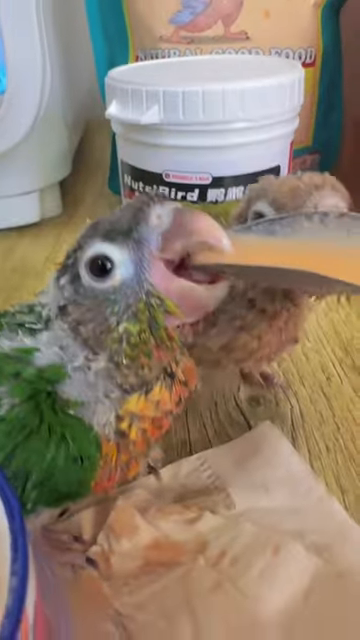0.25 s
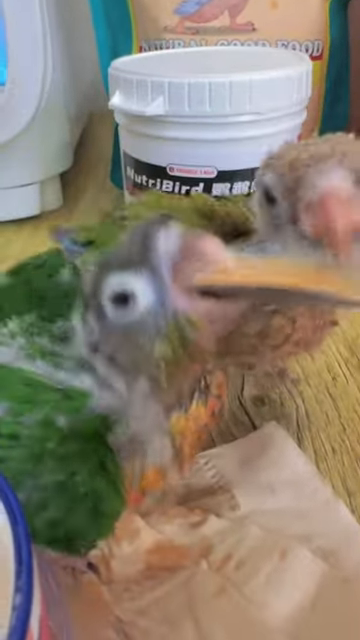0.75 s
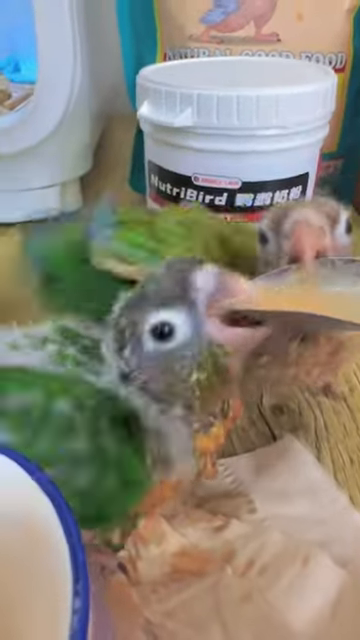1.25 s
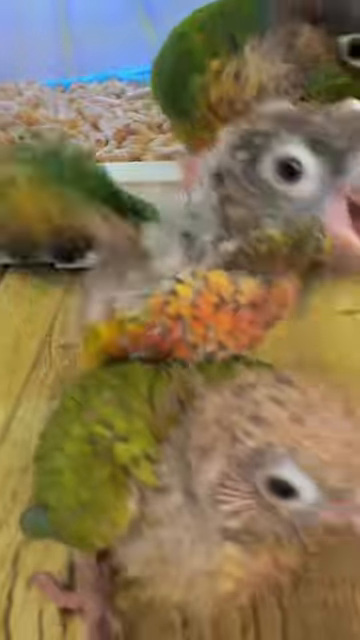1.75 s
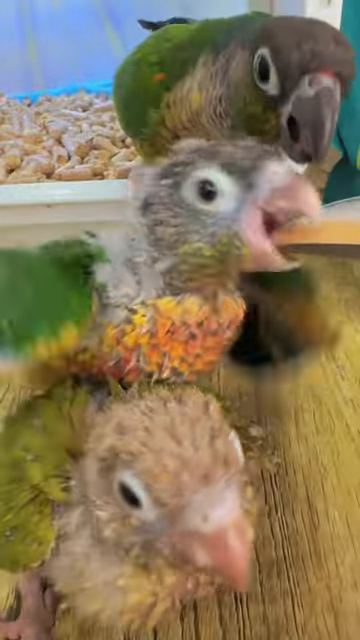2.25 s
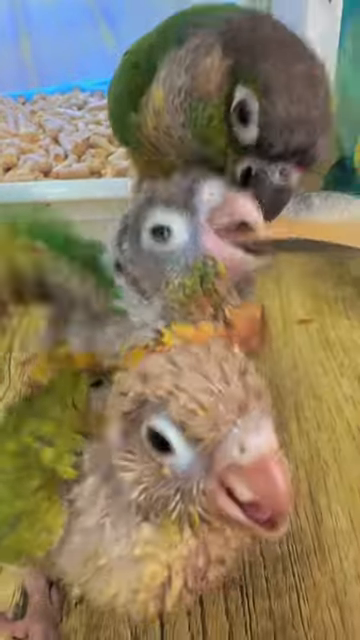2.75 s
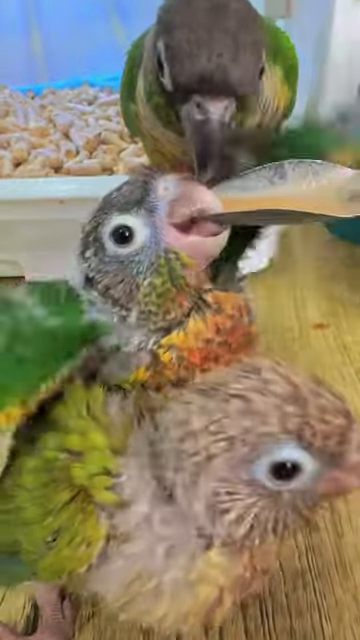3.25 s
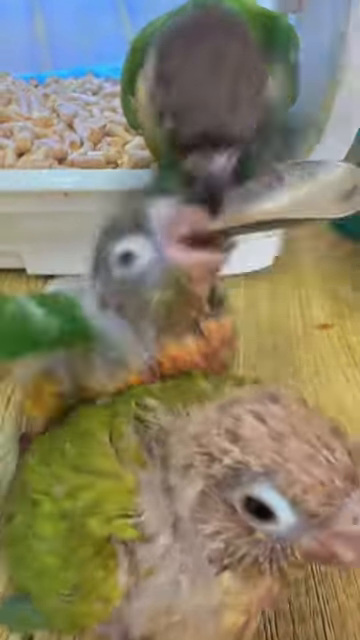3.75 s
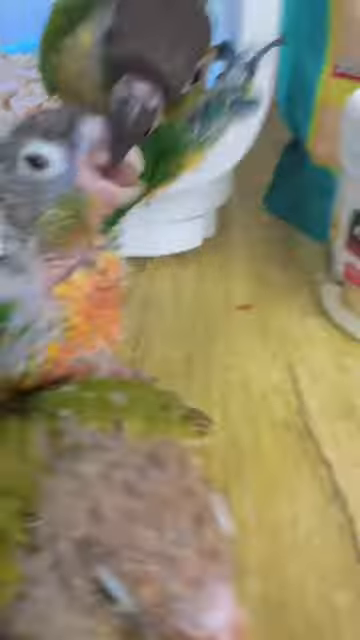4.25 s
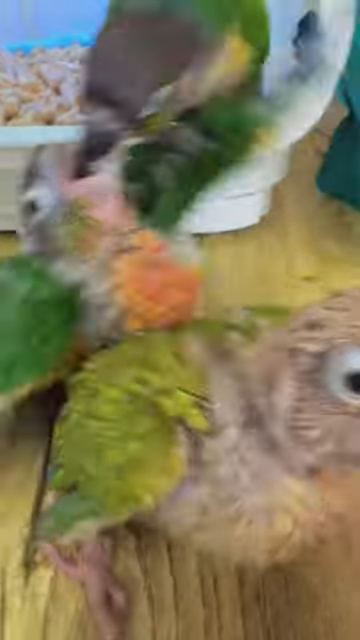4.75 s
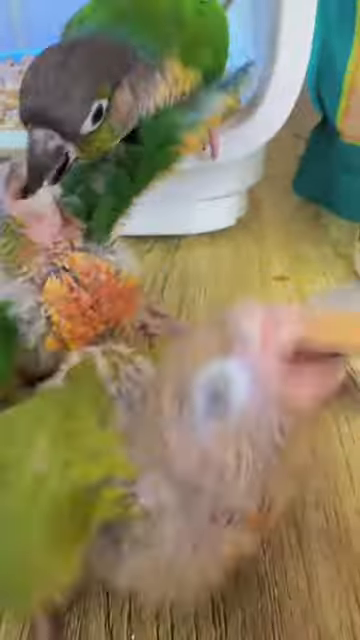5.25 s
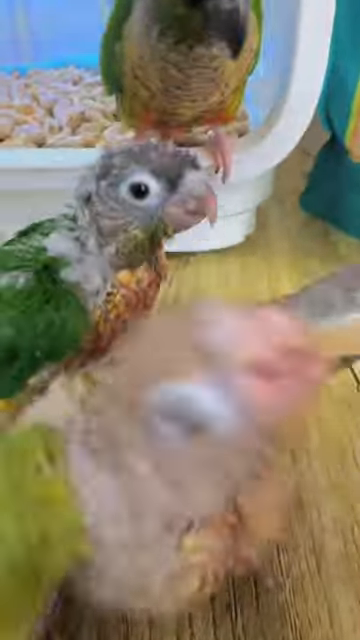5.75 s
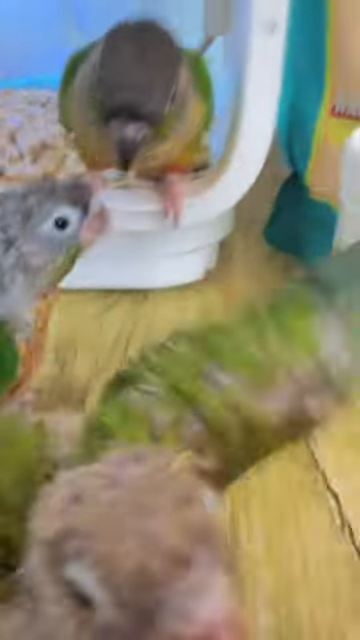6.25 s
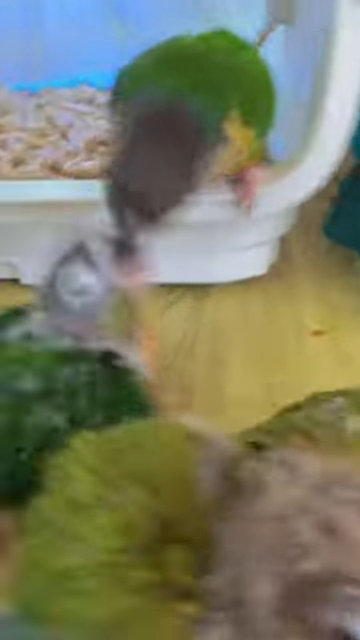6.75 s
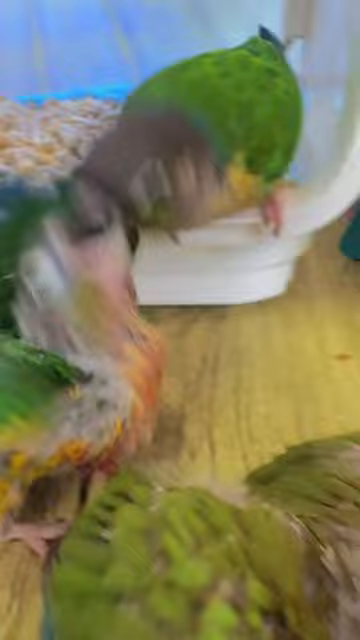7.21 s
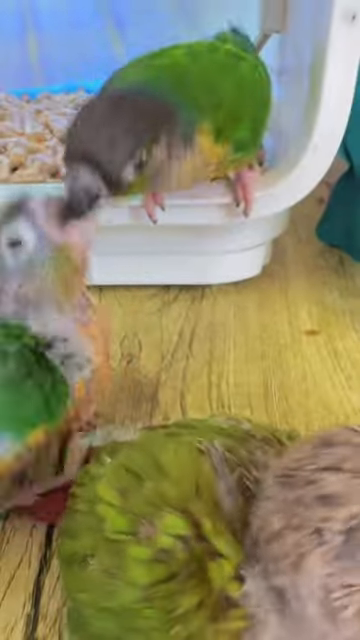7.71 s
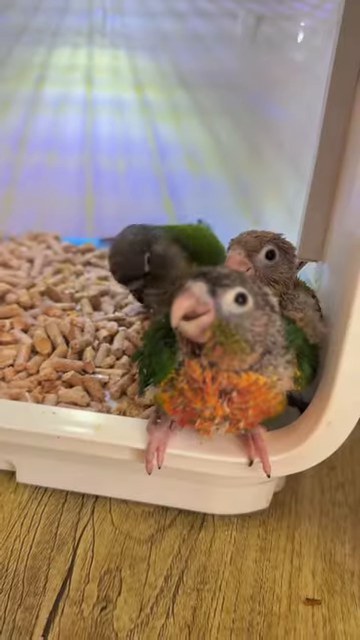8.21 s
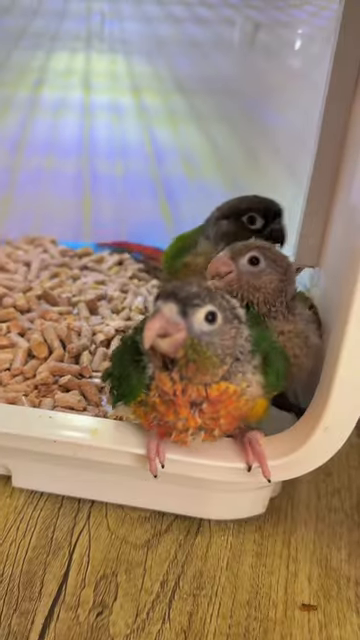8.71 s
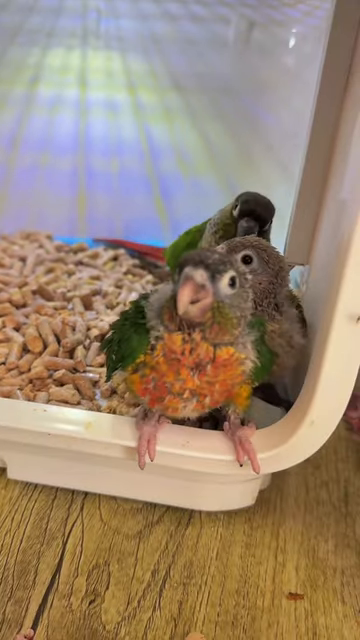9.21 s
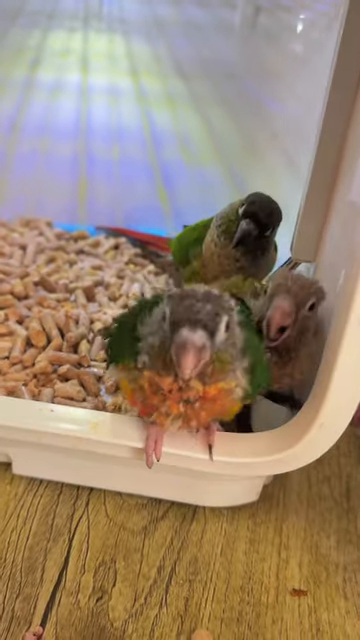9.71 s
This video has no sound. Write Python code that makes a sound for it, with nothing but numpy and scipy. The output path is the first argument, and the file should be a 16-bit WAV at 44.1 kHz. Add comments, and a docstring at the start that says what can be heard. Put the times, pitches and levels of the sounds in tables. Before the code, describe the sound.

Short squeaky chirps and raspy squawks from several baby parrots repeat in uneven clusters, heard up close indoors. Faint spoon ticks and soft shuffling sit under the calls. About two thirds through, a few clicks build to a sharp tap on the spoon, followed by hollow bumps on a plastic tub and rustling feathers. The birds then call in a quick flurry, with two thin whistles, over faint room air.

```python
"""Young parrots beg at a feeding spoon, crowded on a wooden floor, close by in a small room. Each squawk is a
short arch of pitch from the syrinx, clear or rasping, shaped by throat and beak; a few carry a dull puff, and
two late calls are thin whistles. Beaks and claws tick and ring the spoon, bodies bump a plastic tub, and low
thuds follow some squawks. Low rumble and feather rustle follow the stirring, over faint room air."""
import sys
import numpy as np
from scipy import signal
from scipy.fft import rfft, irfft, next_fast_len
from scipy.io import wavfile

SR = 44100
rng = np.random.default_rng(int(sys.argv[2]) if len(sys.argv) > 2 else 0)


def bounce(signal):
    """Save signal as a 16-bit WAV file at the path given by the first command-line argument."""
    frames = np.transpose(np.atleast_2d(signal))
    limited = np.clip(frames, -1, 1)
    pcm = np.round(limited * 32767).astype(np.int16)
    wavfile.write(sys.argv[1], SR, pcm)


N = 439677

# Stirring envelopes (time [s], relative level [dB])
RUMBLE_ENVELOPE = [(0.0, -73.5), (0.94, -79.5), (1.86, -70.5), (3.19, -85.5), (3.64, -75.5), (3.97, -60.5),
                   (4.33, -81.5), (5.28, -82.5), (5.69, -71.5), (6.75, -69), (7.3, -72), (7.53, -61),
                   (8.02, -62.5), (9.97, -63.5)]
RUSTLE_ENVELOPE = [(0.0, -88.5), (0.5, -75.5), (0.94, -75.5), (1.91, -75), (3.13, -82), (3.91, -62.5),
                   (4.02, -65.5), (4.28, -76), (4.91, -87), (5.97, -71.5), (6.94, -71.5), (7.36, -65),
                   (7.53, -61.5), (7.77, -52.5), (8.0, -65.5), (9.97, -70.5)]
# Noise spectra (frequency [Hz], gain [dB])
RUMBLE_SPECTRUM = [(12, -39), (20, -10), (43, -3.5), (65, 1.5), (200, -18), (260, -41.5), (440, -120)]
RUSTLE_SPECTRUM = [(70, -16), (130, -2), (330, -5.5), (500, -13), (900, -14.5), (1600, -26), (4000, -37)]
AIR_SPECTRUM = [(100, 5), (500, -9), (850, -3), (1200, -8.5), (2000, -5.5), (8000, -15.5), (11000, -29.5),
                (16000, -36)]
CRACK_SPECTRUM = [(200, -30.5), (600, -9.5), (1400, 4), (4000, -12), (8000, -5), (10000, -18.5),
                  (16000, -33.5)]
PUFF_SPECTRUM = [(20, -13), (50, -3), (130, -1), (400, -8.5), (850, -2), (1600, -30.5), (4000, -58.5)]
# Beak and claw ticks; body bumps and low thuds after squawks (time [s], relative level [dB], contact pitch
# [Hz])
TICK_HITS = [(0.2259, -44.5, 2380), (1.9944, -49, 8380), (3.3692, -44, 8940), (3.6336, -46, 8400),
             (5.4884, -43.5, 5660), (5.6042, -43, 5600), (5.6488, -50, 6050), (5.6914, -61, 2040),
             (5.7089, -41, 5720), (6.2025, -20.5, 8040), (6.2742, -44.5, 3880), (6.376, -47, 2290),
             (6.4115, -38, 7220), (6.4373, -28, 7445), (6.479, -6.5, 6800), (8.0597, -44, 5160),
             (8.2357, -41.5, 7860), (9.1662, -49, 2200)]
BUMP_HITS = [(1.752, -36, 153), (1.829, -43, 125), (3.659, -42, 173), (3.86, -43, 380), (3.921, -49, 45),
             (4.022, -43, 307), (4.04, -34, 64.4), (6.139, -51, 170), (7.344, -32, 176), (7.516, -35, 690),
             (7.577, -23.5, 788), (7.711, -50, 275), (7.782, -13.5, 192), (7.807, -18.5, 172),
             (8.39, -34.5, 49.5)]
# Ringing modes (frequency [Hz], gain [dB], T60 [s])
SPOON_MODES = [(1453, -2, .02), (2794, 0, .05), (3200, -8, .09), (3900, -14, .04), (7400, -9, .04),
               (8270, -3, .05)]
TUB_MODES = [(118, -7, .1), (178, -1, .22), (340, -4, .14), (395, -9, .14), (620, -10, .14), (780, -4, .11),
             (1080, -4, .09), (1500, -7, .08)]
# Squawks (time [s], length [s], attack [s], level [dB], crest pitch [Hz], rasp [dB], tilt [dB/octave],
#   throat formant [Hz], beak formant [Hz], formant gain [dB])
SQUAWK_CALLS = [(0.263, 0.087, 0.026, -16.0, 1112, 3, 1, 4940, 8230, 5.5),
                (0.507, 0.085, 0.012, -16, 1117, -19.5, -2, 4440, 6620, 9),
                (0.561, 0.068, 0.017, -21.0, 1237, 6.5, -1.5, 4340, 6700, 5.5),
                (0.693, 0.16, 0.038, -49.5, 1570, 3.5, -2, 2580, 6500, 7),
                (0.772, 0.085, 0.016, -15.0, 1151, -17.5, -1, 4550, 6760, 7),
                (1.139, 0.072, 0.019, -21.5, 1200, 4, -1, 5620, 7180, 4.5),
                (1.212, 0.09, 0.028, -16, 1219, -10.5, -0.5, 4750, 7290, 6),
                (1.467, 0.058, 0.02, -27, 992, 0, -3, 5280, 6680, 8),
                (1.681, 0.056, 0.0023, -17, 1209, 2.5, 2, 5380, 7260, 5),
                (1.758, 0.056, 0.026, -19.0, 1324, -7, 0.0, 6160, 8290, 8),
                (2.173, 0.054, 0.008, -16.5, 1352, 0, 1, 4110, 5700, 7),
                (2.568, 0.069, 0.01, -16, 1411, 6.5, 0, 4230, 5440, 10),
                (2.65, 0.073, 0.015, -21, 1314, -12, 2, 5740, 8030, 11),
                (2.697, 0.046, 0.01, -24.5, 1380, 5.5, 0.5, 4200, 3000, 5),
                (2.761, 0.064, 0.018, -20, 1249, -7.5, 0.5, 5350, 7840, 10.5),
                (3.252, 0.048, 0.031, -26.5, 1537, 4, -2, 3190, 4130, 11.5),
                (3.397, 0.066, 0.014, -21, 1256, -6, 0, 5630, 8940, 6),
                (3.687, 0.044, 0.011, -23.5, 1425, 1, -0.5, 4310, 3620, 5.5),
                (3.777, 0.068, 0.014, -17.5, 1316, -2.5, 0.5, 5990, 8390, 12),
                (3.921, 0.049, 0.012, -22.5, 1391, 0, 0, 4380, 6880, 8.5),
                (4.13, 0.048, 0.028, -30.5, 1260, 2, -3.5, 2180, 3810, 11.5),
                (4.218, 0.044, 0.009, -20.5, 1266, 4, -1.5, 3910, 6060, 9),
                (4.519, 0.046, 0.012, -21, 1250, -3.5, 0, 5740, 7900, 12.5),
                (4.605, 0.07, 0.016, -21, 1214, -5, -2, 5750, 7960, 10.5),
                (4.652, 0.062, 0.018, -22.5, 1200, 9, 0.5, 5360, 7920, 6.5),
                (4.973, 0.07, 0.018, -20, 1404, 1.5, 4.0, 3400, 7930, 3),
                (5.055, 0.085, 0.017, -23, 1220, -4.5, -1.5, 5640, 4330, 6),
                (5.079, 0.057, 0.02, -24.0, 1246, 7, 3.5, 2740, 8160, 15),
                (5.354, 0.059, 0.016, -24.5, 1180, 1, -0.5, 4170, 6110, 7.5),
                (5.924, 0.041, 0.025, -24.5, 1407, 7.5, 1.5, 3430, 6300, 11),
                (5.988, 0.049, 0.019, -14, 2370, -12, -3, 5600, 7150, 12.5),
                (6.121, 0.042, 0.014, -22.0, 1191, 5, 2.5, 4030, 5790, 5.5),
                (6.49, 0.062, 0.017, -16.5, 1260, -10, -2.5, 5800, 7810, 12),
                (6.539, 0.052, 0.003, -25.5, 1128, 3, 1.5, 5650, 8190, 4.5),
                (6.59, 0.073, 0.024, -20.5, 1199, -7, -0.5, 5830, 7760, 8),
                (6.815, 0.054, 0.017, -20, 1224, 0, 0.5, 3340, 5790, 9.5),
                (7.024, 0.083, 0.016, -19, 1241, -2, 1.5, 2830, 7770, 4),
                (7.325, 0.056, 0.015, -23.5, 1136, 5, 2.5, 2980, 4370, 6.5),
                (7.433, 0.058, 0.031, -21.0, 1228, -11, 0.5, 2550, 5930, 7),
                (7.736, 0.061, 0.018, -23.5, 1303, -4.5, 0.5, 4180, 7680, 6),
                (8.428, 0.054, 0.01, -18.5, 1123, 0, 0.5, 2000, 5580, 3.5),
                (8.466, 0.071, 0.008, -16, 1364, 6.5, -0.5, 5420, 5640, 6.5),
                (8.531, 0.06, 0.011, -23.5, 1230, 9.5, 0.5, 4230, 5780, 3),
                (8.568, 0.05, 0.024, -18.5, 1384, -17, -0.5, 4230, 8330, 11.5),
                (8.644, 0.048, 0.019, -43, 1045, 2, -3.5, 2600, 3800, 8),
                (8.819, 0.057, 0.014, -18.5, 1367, -1.5, 1, 4440, 6590, 2),
                (9.498, 0.045, 0.015, -17.5, 1480, 0.5, 4.0, 4080, 6790, 6),
                (9.557, 0.074, 0.024, -18, 1371, -0.5, 1, 4380, 6160, 7),
                (9.673, 0.071, 0.014, -16.5, 1388, -10, 0.5, 4270, 5480, 5.5)]
# Vocal tract response, all birds (frequency [Hz], gain [dB])
TRACT_SPECTRUM = [(100, -42), (400, -49.5), (750, -17.5), (1100, -17.5), (1600, -12), (2400, -8.5),
                  (3200, -4.5), (4200, -3.5), (5400, 1), (7800, -4), (9000, -9.5), (10500, -14.5),
                  (11500, -52), (13000, -32.5), (15500, -18.5)]
# Puffs under squawks (time [s], level [dB])
PUFF_EVENTS = [(0.277, -42.5), (1.68, -43.5), (2.175, -51), (6.49, -49), (7.325, -48.5)]
# Whistles (time [s], length [s], level [dB], crest position [0-1])
WHISTLE_CALLS = [(8.697, .064, -21.5, .25), (8.77, .058, -18, 0.4)]
# Whistle formants (frequency [Hz], gain [dB])
WHISTLE_PEAKS = [(4278, 19.5), (2580, 20)]
# Wall reverberation (frequency [Hz], T60 [s])
WALL_DECAY = [(100, 0.84), (1000, 0.073), (5000, 0.3), (9000, 0.068), (16000, 0.48)]

CUTOFF_HZ = 16000


def from_db(db):
    return 10 ** (np.asarray(db) / 20)


def unit_rms(x):
    return x / np.sqrt(np.mean(x ** 2) + 1e-20)


def at_hz(points, hz):
    """Table lookup on a log-frequency axis."""
    points = np.array(points)
    return np.interp(np.log(np.maximum(hz, 1)), np.log(points[:, 0]), points[:, 1])


def noise(colour_db, size):
    """Unit-RMS noise with spectrum colour_db(hz)."""
    padded = next_fast_len(size)
    gain = from_db(colour_db(np.fft.rfftfreq(padded, 1 / SR)))
    return unit_rms(irfft(rfft(rng.standard_normal(padded)) * gain, padded)[:size])


def stereo_noise(spectrum, side_db):
    mid, side = [noise(lambda hz: at_hz(spectrum, hz), N) for _ in range(2)]
    return mid + from_db(side_db) * side * [[1], [-1]]


def wobble(rate_hz, size):
    """Unit-RMS random motion, low-passed at rate_hz."""
    return noise(lambda hz: -10 * np.log10(1 + (hz / rate_hz) ** 4), size)


def add(out, start_s, sound):
    i = max(int(start_s * SR), 0)
    out[..., i:i + sound.shape[-1]] += sound[..., :N - i]


def stirring():
    """Shuffling birds: low rumble and fluttering feather rustle."""
    t = np.arange(N) / SR
    rumble_db = np.interp(t, *np.transpose(RUMBLE_ENVELOPE)) + 4.5
    rumble = from_db(rumble_db) * stereo_noise(RUMBLE_SPECTRUM, side_db=-21.5)
    rustle_db = np.interp(t, *np.transpose(RUSTLE_ENVELOPE)) + 1.5 + 2.8 * wobble(30, N)
    return rumble + from_db(rustle_db) * stereo_noise(RUSTLE_SPECTRUM, side_db=-11)


def room_air(level_db=-78.5):
    """Faint steady noise of the still room."""
    return from_db(level_db) * stereo_noise(AIR_SPECTRUM, side_db=-8)


def ticks(size=8192, crack_db=-8, crack_t60_s=.024, ring_db=-11, contact_s=.00062):
    """A hard tip cracks and rings the spoon, most strongly near the contact pitch."""
    out, t = np.zeros(N), np.arange(size) / SR
    for start_s, level_db, centre_hz in TICK_HITS:
        contact_db = lambda hz: -6 * abs(np.log2(np.maximum(hz, 1) / centre_hz))
        crack = noise(lambda hz: at_hz(CRACK_SPECTRUM, hz) + contact_db(hz), size)
        crack *= from_db(crack_db - 60 * t / crack_t60_s)
        damping_db = min(level_db + 25, 0)   # a light touch stays on the metal
        ring = 0
        for hz, mode_db, t60_s in SPOON_MODES:
            envelope = from_db(ring_db + damping_db + mode_db + contact_db(hz) - 60 * t / t60_s)
            ring += envelope * np.sin(2 * np.pi * hz * t)
        add(out, start_s, from_db(level_db) * (crack + ring) * np.minimum(t / contact_s, 1))
    return out


def pitch_arch(progress, crest_hz, crest_at, first_ratio, last_ratio):
    """Pitch [Hz]: rise to the crest, then sag; young voices waver."""
    rise = (1 - first_ratio) * abs(1 - progress / crest_at) ** 2.5
    fall = (1 - last_ratio) * abs((progress - crest_at) / (1 - crest_at)) ** 1.6
    waver = 1 + .011 * wobble(70, len(progress))
    return crest_hz * (1 - np.where(progress < crest_at, rise, fall)) * waver


def vocal_tract(tilt_db_per_oct, formants, width_hz=450):
    """Throat and beak: common response, tilted, plus formants. Returns gain [dB] versus Hz."""
    def tract_db(hz):
        peaks_db = sum(db * np.exp(-.5 * ((hz - peak_hz) / width_hz) ** 2) for peak_hz, db in formants)
        tilt_db = tilt_db_per_oct * np.log2(np.clip(hz, 400, 10000) / 5000)
        return at_hz(TRACT_SPECTRUM, hz) + tilt_db + peaks_db
    return tract_db


def syrinx(length_s, attack_s, release_s, crest_hz, crest_at, end_ratios, rasp_db, tract_db, size=4096):
    """One call, unit RMS over its length: one side sings clear, the other breaks into rasp."""
    t = np.arange(size) / SR
    progress = np.clip(t / length_s, 0, 1)
    pitch_hz = pitch_arch(progress, crest_hz, crest_at, *end_ratios)
    pressure = np.clip(t / attack_s, 0, 1) * np.clip((length_s - t) / release_s, 0, 1)

    order = np.arange(1, 27)[:, None] / 2   # alternate cycles differ: half harmonics
    half_db, odd_db = -9.5 + .6 * min(rasp_db, 0), -3
    flicker_db = 2.2 * np.array([wobble(35, size) for _ in order])
    source_db = np.where(order % 1, half_db, np.where(order % 2, odd_db, 0)) + flicker_db
    partial_hz = order * pitch_hz
    closing_db = (1 - pressure) * abs(partial_hz - 3500) / 1200   # beak nearly shut at both ends
    gains = np.sqrt(2 * pitch_hz) * from_db(source_db + tract_db(partial_hz) - closing_db)
    gains *= partial_hz < CUTOFF_HZ

    def membrane(jitter):
        """Uneven cycles: low harmonics stay lines, high ones smear."""
        phase = 2 * np.pi * np.cumsum(pitch_hz * (1 + jitter * wobble(380, size))) / SR
        return np.sum(gains * np.sin(order * phase + rng.uniform(0, 2 * np.pi, order.shape)), axis=0)

    shimmer = .36 * min(from_db(rasp_db / 2), 1)
    clear = membrane(jitter=.004) * (1 + shimmer * wobble(450, size)) * pressure ** 1.6
    breakup = np.interp(progress / crest_at, [.15, .8], [.3, 1])   # rasp grows towards the crest
    tract_gain = np.linalg.norm(from_db(tract_db(np.arange(CUTOFF_HZ))))
    hiss = from_db(-11) * tract_gain * noise(tract_db, size) * breakup * np.sqrt(pressure)
    rasp = (membrane(jitter=.052 * breakup) + hiss) * pressure ** 1.25
    return unit_rms(clear + from_db(rasp_db) * rasp) * np.sqrt(length_s * SR / size)


def squawks(flat_start_hz=2244.5, sag_per_s=5, crest_at=.42, release_share=.47):
    """Begging calls: lower ones scoop up further, longer ones sag further."""
    out = np.zeros(N)
    for (start_s, length_s, attack_s, level_db, crest_hz, rasp_db, tilt_db_per_oct,
         throat_hz, beak_hz, formant_db) in SQUAWK_CALLS:
        tract_db = vocal_tract(tilt_db_per_oct, [(throat_hz, formant_db), (beak_hz, formant_db)])
        end_ratios = min(np.sqrt(crest_hz / flat_start_hz), 1), 1 - sag_per_s * length_s
        release_s = release_share * length_s
        call = syrinx(length_s, attack_s, release_s, crest_hz, crest_at, end_ratios, rasp_db, tract_db)
        add(out, start_s, from_db(level_db) * call)
    return out


def puffs(size=4096, length_s=.055):
    """Dull noise swells and fades under a few squawks."""
    out, t = np.zeros(N), np.arange(size) / SR
    swell = np.sin(np.pi * np.clip(t / length_s, 0, 1))
    for start_s, level_db in PUFF_EVENTS:
        add(out, start_s, from_db(level_db) * swell * noise(lambda hz: at_hz(PUFF_SPECTRUM, hz), size))
    return out


def bumps(size=16384, scuff_db=-12, scuff_t60_s=.16, ring_db=-13, contact_cycles=.4):
    """A lunging body scuffs the tub and rings its modes, mostly near the contact pitch; a few rows are low
    thuds just after squawks, rung the same way."""
    out, t = np.zeros(N), np.arange(size) / SR
    for start_s, level_db, centre_hz in BUMP_HITS:
        contact_db = lambda hz: -5.5 * np.log2(np.maximum(hz, 1) / centre_hz) ** 2
        scuff = noise(contact_db, size) * from_db(scuff_db - 60 * t / scuff_t60_s)
        ring = 0
        for hz, mode_db, t60_s in TUB_MODES:
            envelope = from_db(ring_db + mode_db + contact_db(hz) / 2 - 60 * t / t60_s)
            ring += envelope * np.sin(2 * np.pi * hz * t) * rng.choice([-1, 1])
        onset = np.minimum(t * centre_hz / contact_cycles, 1)
        add(out, start_s, from_db(level_db) * (scuff + ring) * onset)
    return out


def whistles(crest_hz=4264, end_ratios=(.68, .64), fade_s=.0076, rasp_db=-5):
    """Thin calls: the same syrinx at a much higher pitch."""
    out = np.zeros(N)
    tract_db = vocal_tract(tilt_db_per_oct=-3, formants=WHISTLE_PEAKS)
    for start_s, length_s, level_db, crest_at in WHISTLE_CALLS:
        call = syrinx(length_s, fade_s, fade_s, crest_hz, crest_at, end_ratios, rasp_db, tract_db)
        add(out, start_s, from_db(level_db) * call)
    return out


def room(x, size=22050, early_db=-14, tail_db=-23, side_db=-11):
    """Quick echoes off floor and tub, unlike at each ear; a faint tail off the walls."""
    t, edges_hz = np.arange(size) / SR, np.geomspace(80, 17000, 10)

    def echoes(t60_s, delay_s):
        return unit_rms(rng.standard_normal(size) * from_db(-60 * t / t60_s) * (t > delay_s))

    side = from_db(side_db) * signal.lfilter([1, -1], [1, -.95], echoes(t60_s=.056, delay_s=.0003))
    ears = []
    for sign in (1, -1):
        tail = 0
        for low_hz, high_hz in zip(edges_hz, edges_hz[1:]):
            band = signal.butter(2, [low_hz, high_hz], "band", fs=SR, output="sos")
            t60_s = at_hz(WALL_DECAY, np.sqrt(low_hz * high_hz))
            tail += signal.sosfilt(band, rng.standard_normal(size)) * from_db(-60 * t / t60_s)
        tail = from_db(tail_db) * unit_rms(tail * (t > .006))
        early = from_db(early_db) * echoes(t60_s=.055, delay_s=.001)
        response = (early + tail) / np.sqrt(size) + sign * side / np.sqrt(size)
        ears.append(x + signal.fftconvolve(x, response)[:N])
    return np.array(ears)


def scene():
    """Birds straight ahead, tub slightly left."""
    birds = room(squawks() + whistles() + ticks())
    tub = room(bumps()) * from_db([[2], [-2.5]])
    return birds + tub + puffs() + stirring() + room_air()


def record(dry, ceiling=.9):
    """Soft peak limit, then a steep low-pass."""
    rounded = dry / (1 + (dry / ceiling) ** 6) ** (1 / 6)
    return signal.sosfilt(signal.ellip(10, .1, 80, CUTOFF_HZ, fs=SR, output="sos"), rounded)


dry = scene()
out = record(dry)
bounce(out)
```